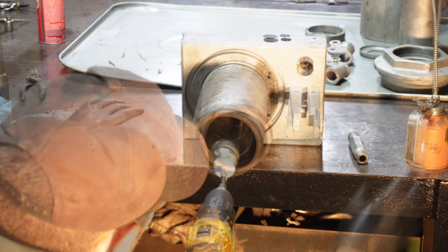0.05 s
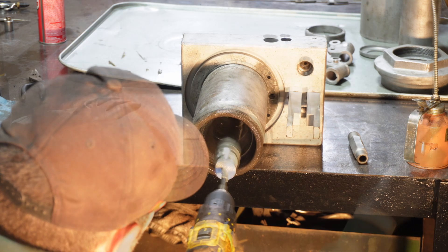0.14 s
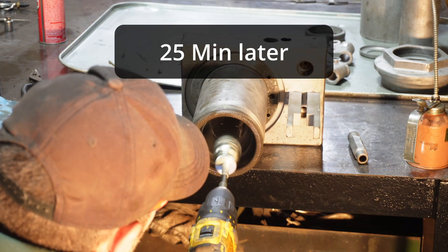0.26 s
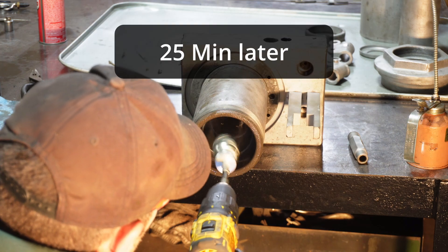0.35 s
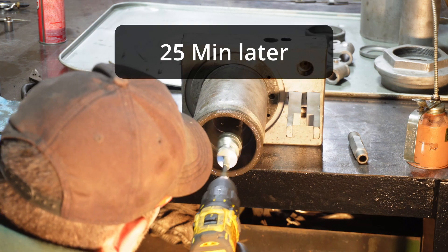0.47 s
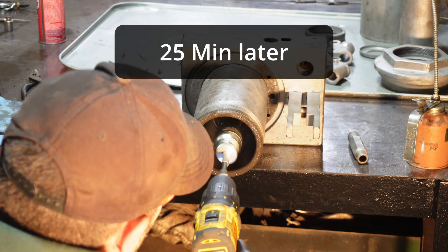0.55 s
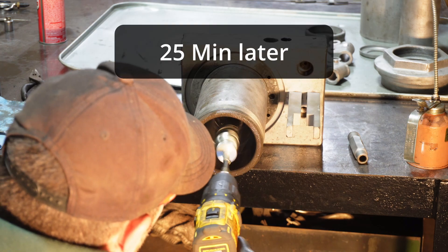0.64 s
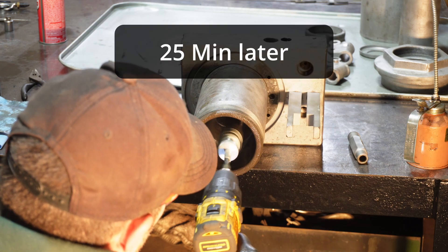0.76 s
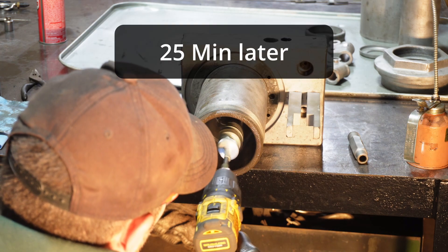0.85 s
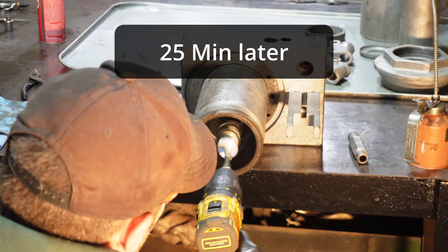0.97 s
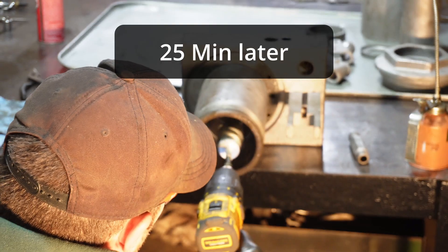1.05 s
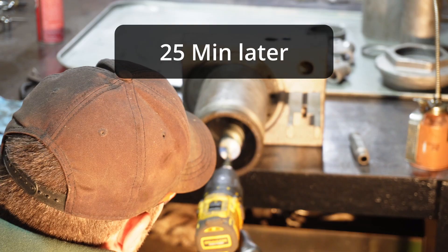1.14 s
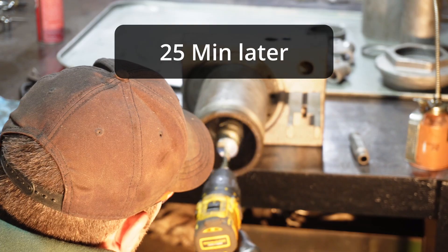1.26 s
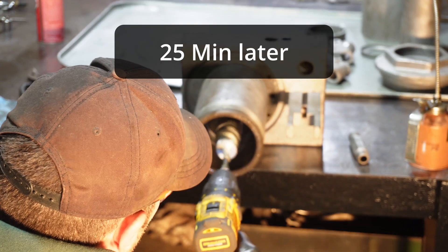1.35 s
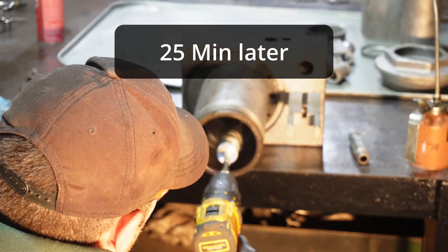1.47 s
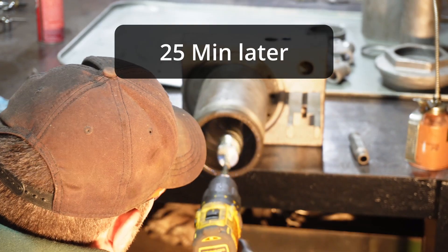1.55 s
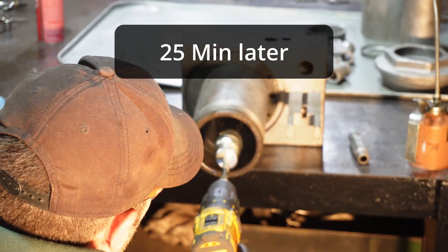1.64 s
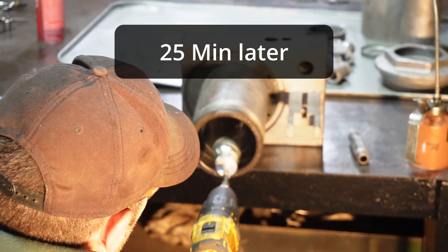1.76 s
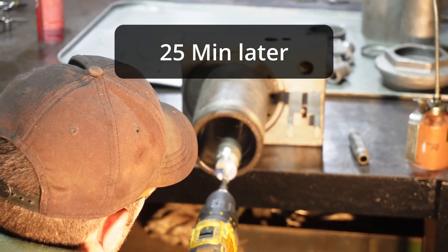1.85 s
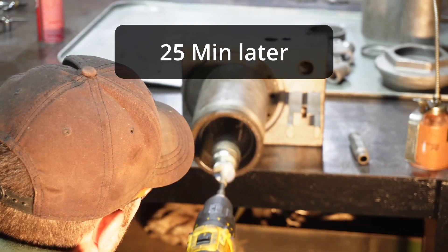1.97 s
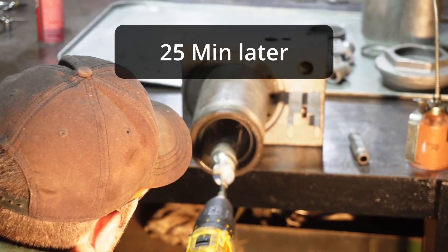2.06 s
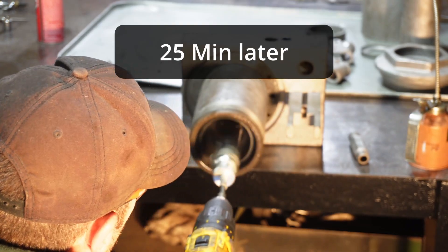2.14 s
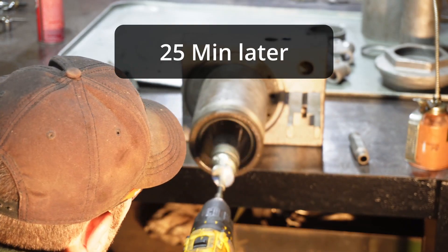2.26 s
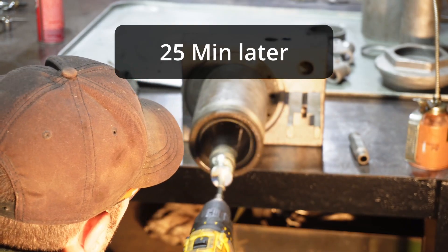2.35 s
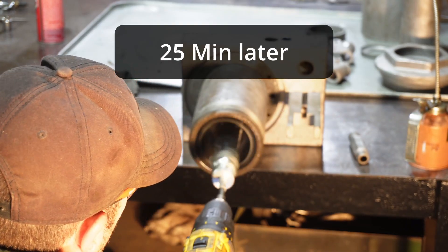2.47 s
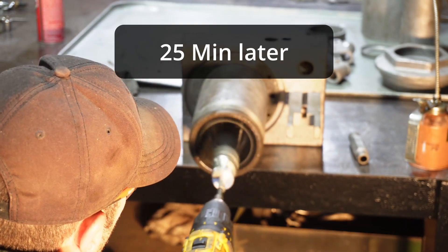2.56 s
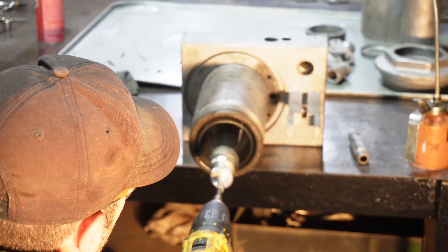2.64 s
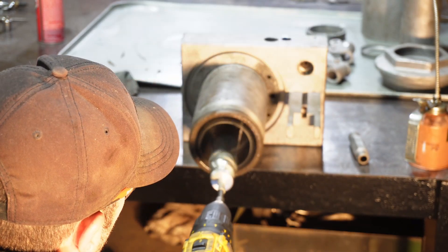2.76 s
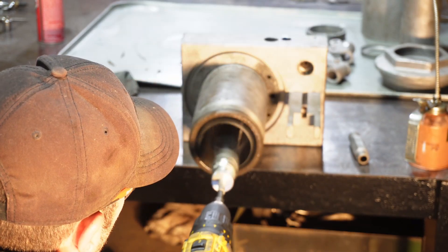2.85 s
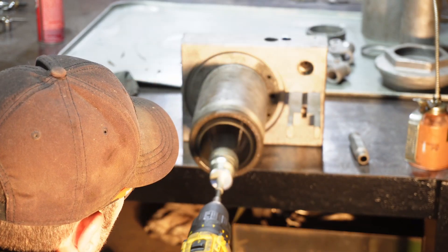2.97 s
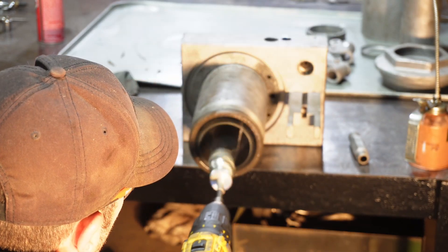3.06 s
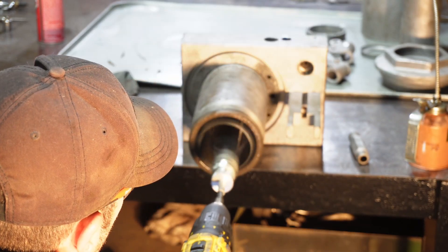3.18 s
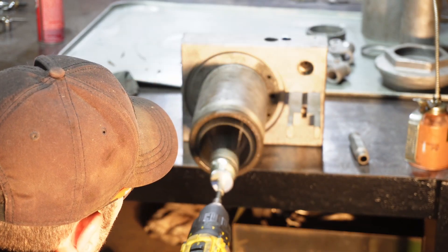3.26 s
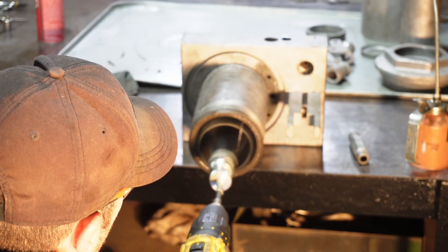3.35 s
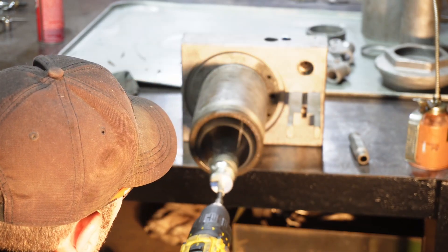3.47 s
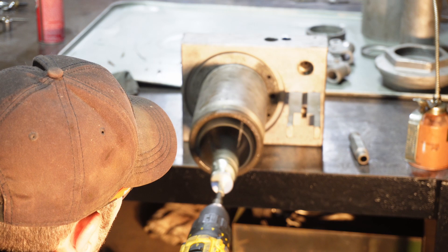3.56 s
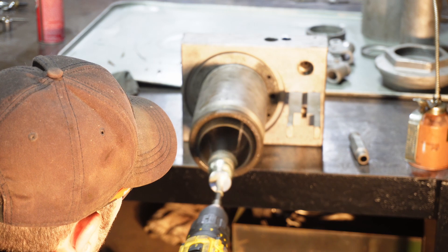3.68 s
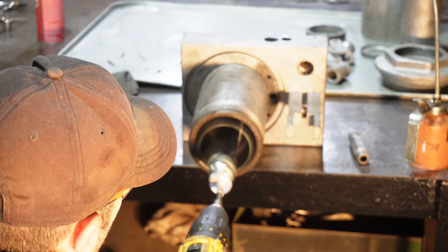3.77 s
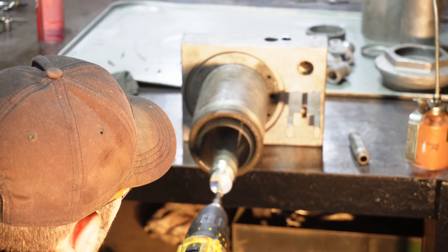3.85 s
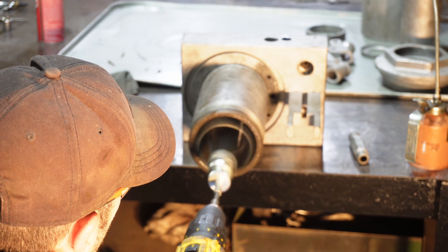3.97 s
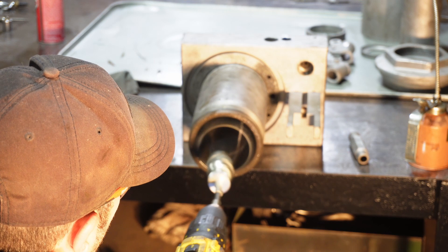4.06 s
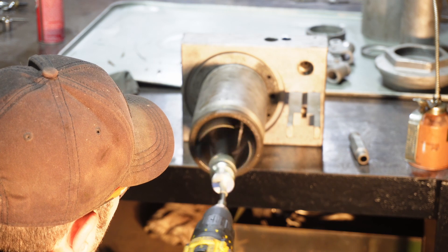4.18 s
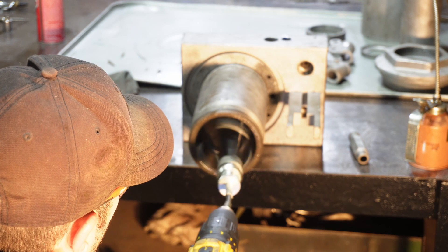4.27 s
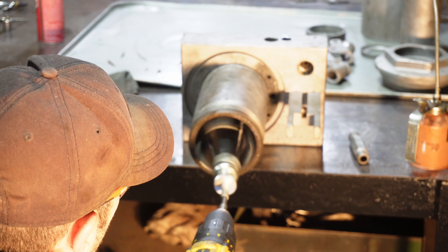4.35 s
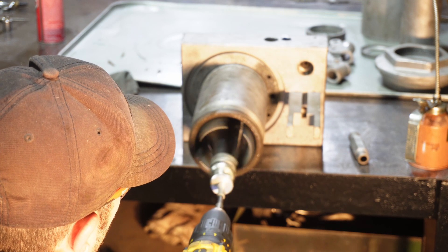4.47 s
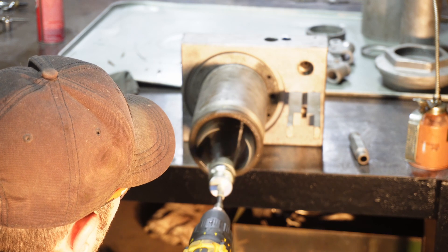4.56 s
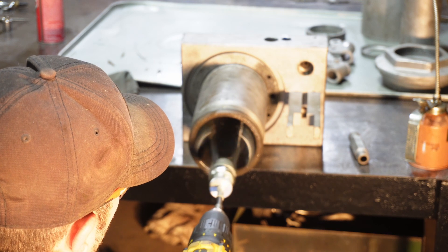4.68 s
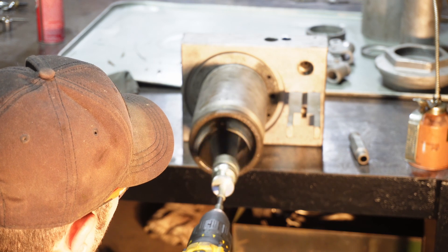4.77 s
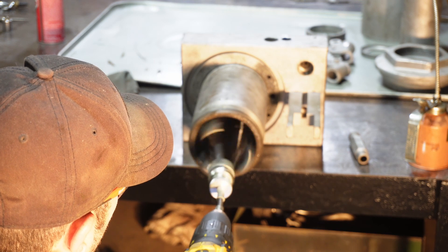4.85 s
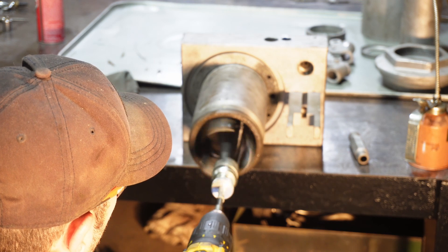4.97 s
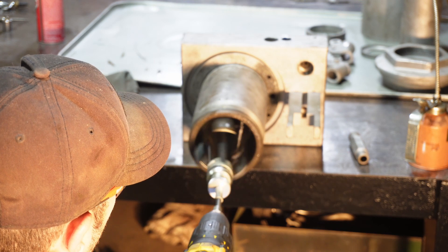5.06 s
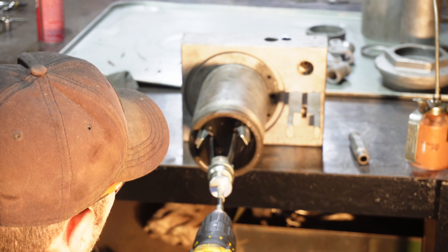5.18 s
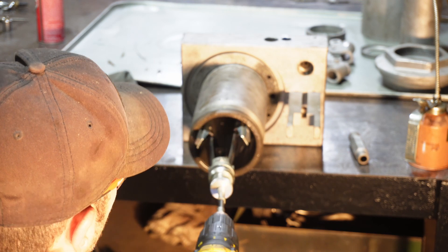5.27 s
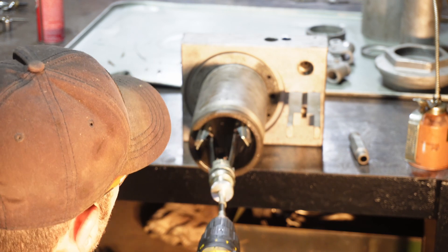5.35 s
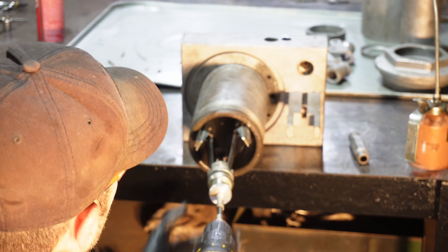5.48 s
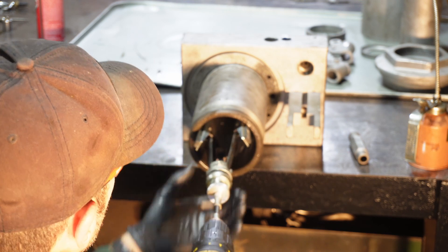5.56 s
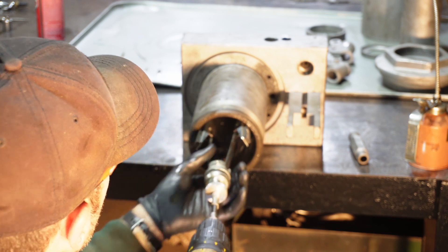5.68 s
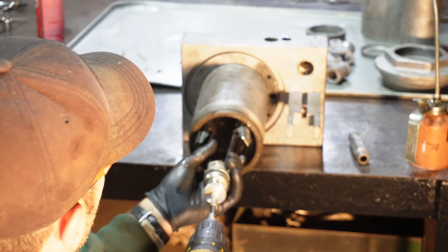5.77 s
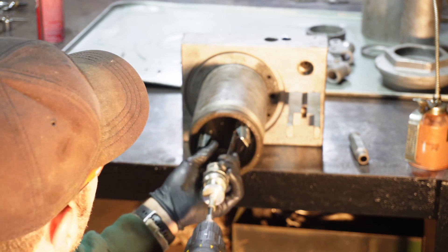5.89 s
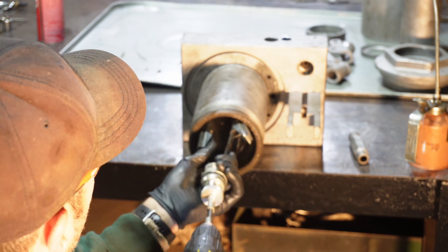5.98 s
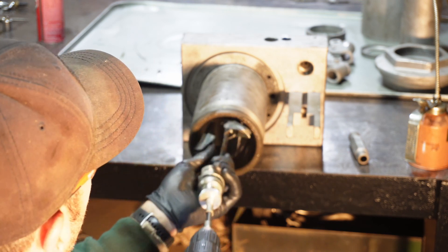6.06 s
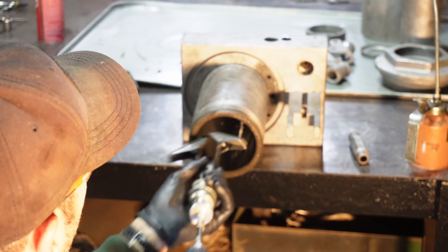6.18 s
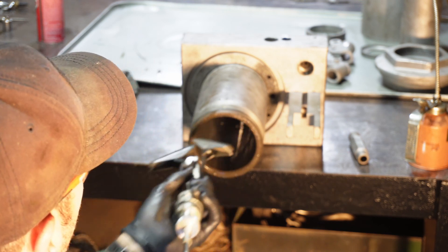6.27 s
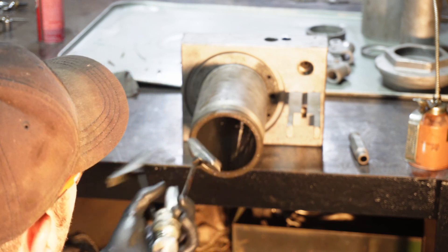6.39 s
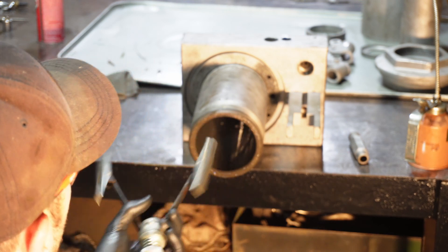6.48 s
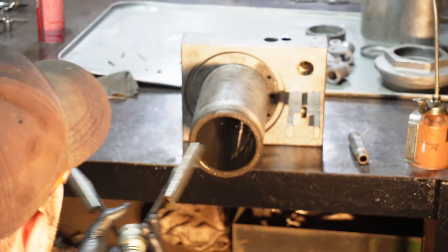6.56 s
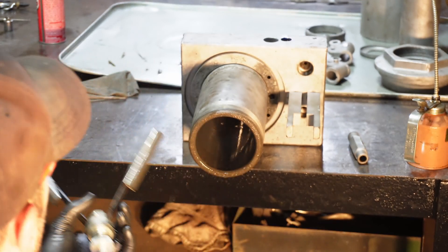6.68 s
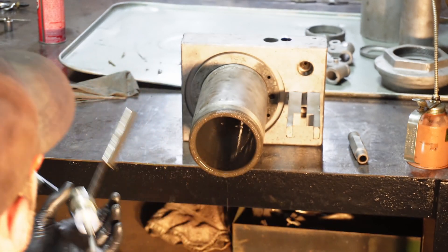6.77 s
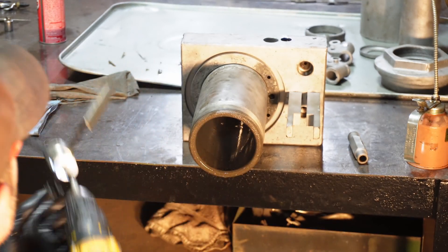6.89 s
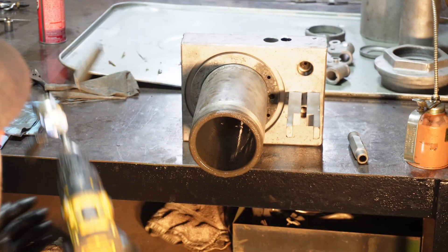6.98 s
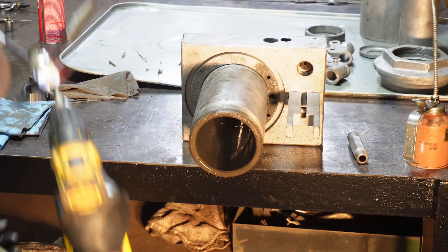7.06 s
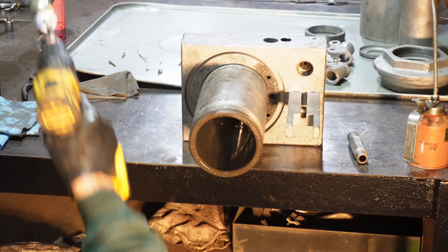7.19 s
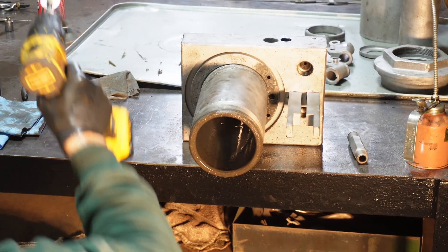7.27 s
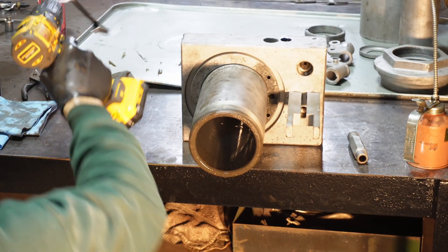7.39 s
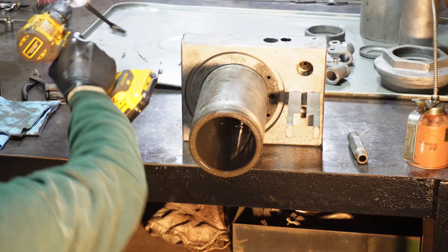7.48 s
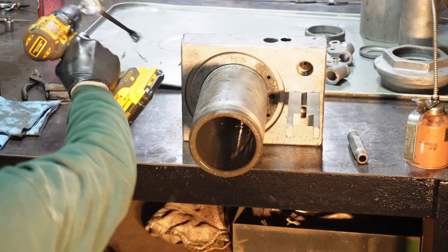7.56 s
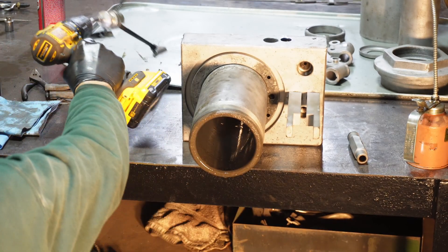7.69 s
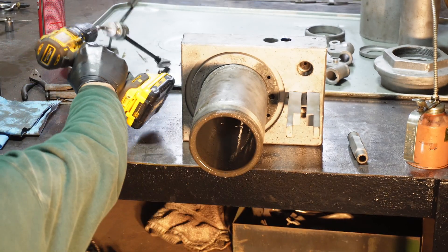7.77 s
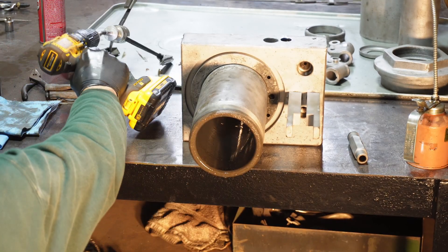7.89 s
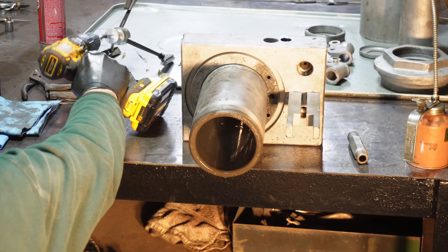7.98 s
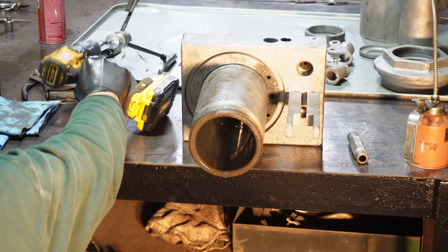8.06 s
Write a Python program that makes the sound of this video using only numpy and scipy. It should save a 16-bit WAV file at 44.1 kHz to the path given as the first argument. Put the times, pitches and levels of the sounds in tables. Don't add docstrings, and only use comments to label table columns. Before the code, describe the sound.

Close in a quiet workshop, a cordless drill whines at near full speed, abrasive stones scraping inside a steel cylinder. After about four seconds the pitch sinks in two steps and ends with a click. The sprung hone rattles out of the bore, loose arms tick, gloves and sleeves rustle, and finally the drill drags and drops onto a steel bench with a short, hollow ring.

```python
import sys
import numpy as np
from scipy import signal
from scipy.fft import rfft, irfft, next_fast_len
from scipy.io import wavfile
from scipy.ndimage import map_coordinates

SR = 44100
rng = np.random.default_rng(int(sys.argv[2]) if len(sys.argv) > 2 else 0)


def nominal_scale(level):
    x = np.asarray(level, float) / 20
    return 10 ** x


def store_pcm(level_fs):
    pcm = np.round(np.clip(level_fs, -1, 1) * 32767).astype(np.int16)
    wavfile.write(sys.argv[1], SR, np.atleast_2d(pcm).T)


N = 358533
TIME = np.arange(N) / SR

# [f/Hz, level/dB]
FLOOR_SPECTRUM = [(15, -41), (25, -5.5), (154, -13), (320, -4), (825, -37), (945, -28), (2070, -19),
                  (5360, -21), (12100, -27), (16300, -26.5)]
# [t/s, level/dB]
MOVEMENT = [(5.18, -56), (5.25, -65), (5.5, -65.5), (5.83, -68), (6.07, -56), (6.55, -64), (6.68, -67),
            (7.07, -53.5), (7.4, -53), (7.83, -58)]
# [f/Hz, density/dB]
MURMUR_SPECTRUM = [(15, -47), (25, -5), (131, -5), (293, 5), (331, 1), (461, 6.5), (712, 2), (913, 1.5),
                   (2620, -12), (3500, -21), (4550, -60), (7700, -120)]
# [f/Hz, density/dB]
RUSTLE_SPECTRUM = [(1060, -45), (1800, -8.5), (3250, -8), (4120, -3.5), (5150, -1), (6910, -9), (7650, -23),
                   (12900, -19), (16300, -31)]
# [f/Hz, width/Hz, level/dB]
SPRING_MODES = [(2860, 140, 2), (4200, 350, 5.5), (5270, 160, 2), (7330, 130, 2), (8220, 160, -4.5),
                (12900, 400, -19)]
# [t/s, level/dB]
FAN_LEVEL = [(5.25, -92), (5.45, -65), (6, -72), (6.3, -58), (6.85, -67), (7, -90)]
# [t/s, level/dB]
THUMPS = [(5.65, -80), (6.92, -54), (7.66, -60)]
# [t/s, level/dB, f/Hz]
SWISHES = [(5.42, -63, 1600), (7.18, -57, 1000), (7.38, -56, 2500), (7.66, -59, 700)]
# [t/s, rise/s, sheet rumble level/dB, edge grit level/dB, grit start re its peak/dB]
BENCH_MOVES = [
    (7.831, 0.079, -29, -39.5, 0),
    (8.019, 0.0066, -20, -31.5, -25),
]
# [f/Hz, density/dB]
SHEET_SPECTRA = [
    [(35, -60), (60, -36), (268, -11), (325, -2), (543, -7), (669, 1), (825, -9), (1100, -7), (2800, -22),
     (3640, -50), (6160, -120)],
    [(35, -76), (60, -61), (124, -14.5), (221, -14), (281, -2.5), (319, -13), (369, 2.5), (407, 0.5),
     (2800, -23.5), (3640, -59), (6160, -120)],
]
# [f/Hz, density/dB]
GRIT_SPECTRUM = [(1060, -33), (1800, -23), (2350, -6), (2930, 3), (3870, 8), (4690, 5), (15100, -21),
                 (16300, -40)]
# [f/Hz, level/dB, t60/s]
LANDING = (8.0185, [(280, -29, 5.0), (413, 4.5, 0.23), (591, -11.5, 0.73), (820, 4, 0.16), (1120, -12, 0.5),
           (1410, -16.5, 0.35)])
# [t/s, first mode level/dB, second mode level/dB]
WALL_NUDGES = [(4.52, -57, -58), (4.92, -50, -64), (5.23, -55, -88), (5.46, -58, -76), (5.66, -62, -85),
               (5.96, -56, -84), (6.07, -48, -48.5), (6.25, -53, -68), (6.32, -53.5, -75)]
WALL_HZ = [326, 408]
# [t/s, level/dB]
SQUEAKS = [(5.862, -77), (6.035, -55.5), (6.09, -60)]
# [t/s, peak level/dB, f/Hz, edge level/dB]
TICKS = [(5.1632, -20, 3870, -17), (5.2974, -42, 5180, -13), (5.327, -44, 3460, -36),
         (5.392, -45.5, 3150, -22), (5.454, -47, 5350, -13), (5.5832, -49, 5170, -8),
         (6.712, -45, 900, -23), (6.7496, -54, 4310, -19), (6.7754, -39, 4320, -16), (6.78, -36, 4200, -17),
         (6.8236, -30.5, 2440, -25), (6.8319, -27.5, 4340, -25), (6.864, -57, 4180, -13),
         (6.8902, -46, 5740, -9), (6.9055, -27.5, 5270, -8), (6.91, -26.5, 4820, -12),
         (6.9204, -31, 4970, -14), (7.0329, -43, 4560, -15), (7.067, -39, 2480, -24),
         (7.0865, -35, 6050, -34), (7.1776, -60.5, 1000, -34), (7.3215, -37.5, 5870, -7),
         (7.4659, -47, 5200, -22), (7.5356, -37, 4660, -25), (7.606, -34.5, 5430, -22),
         (7.619, -40, 5280, -27.5), (7.7263, -43, 4270, -20), (7.7608, -45, 4150, -20)]
# [t/s, peak level/dB, f/Hz, chatter/s]
RATTLE = [(5.8636, -23, 5300, 0), (5.8855, -38, 5200, 0), (5.995, -34, 4700, 0), (6.006, -30, 4610, 0),
          (6.0163, -23, 4450, 0), (6.109, -29.5, 4600, 0), (6.117, -19, 4530, 0.0015),
          (6.127, -19.5, 5300, .02), (6.173, -21, 4100, 0), (6.183, -46, 4240, 0), (6.2606, -25.5, 5000, 0),
          (6.28, -33.5, 5070, 0), (6.4065, -37, 3930, 0), (6.416, -36, 3850, 0.00064),
          (6.4344, -21.5, 4200, 0), (6.452, -31, 4370, .01), (6.475, -27.5, 4070, .01),
          (6.5024, -40, 4070, 0), (6.5527, -24, 4560, .01), (6.594, -22, 5250, 0), (6.5973, -29, 7940, 0),
          (6.616, -25.5, 4550, .02), (6.653, -45, 4440, 0)]
# [f/Hz, width/Hz, level/dB]
ARM_MODES = [(2270, 190, -13), (4200, 560, -6), (5200, 180, -29), (7370, 1400, -6), (7940, 3200, -7)]
# [f/Hz, density/dB]
SCRAPE_SPECTRUM = [(24, -65), (40, -61), (314, -9.5), (511, -11.5), (612, -11), (1090, -10.5), (1460, -2.5),
                   (2020, -7), (3000, -6), (3900, -34), (6600, -120)]
# [f/Hz, width/Hz, level/dB]
BORE_MODES = [(332.4, 23, 7.5), (394, 164, -3), (907, 128, 15), (1310, 27, -34), (1610, 204, 5),
              (1793, 81, 2.5)]
# [spindle order, level over the scrape/dB]
SHAKE = [(3, -33.5), (4, -35.5), (5, -47), (6, -36)]
# [f/Hz, density/dB]
HISS_SPECTRUM = [(2650, -30.5), (4500, -9.5), (4570, -17), (5040, -2.5), (6320, -5.5), (8220, -3.5),
                 (9820, -9.5), (14200, -9), (15300, -7.5), (16300, -49.5)]
# [f/Hz, width/Hz, level/dB]
HOUSING_MODES = [(3370, 316, 0), (4200, 890, -0.5), (5090, 710, -1.5), (2615, 95, -6)]
# [t/s, whine f/Hz]
FULL_SPEED = [(0, 2607), (.14, 2596), (.36, 2527), (.48, 2552), (.84, 2560), (1.2, 2581), (1.46, 2607),
              (1.57, 2601), (1.68, 2561), (2.06, 2529), (2.3, 2547), (2.54, 2565), (2.76, 2568),
              (2.9, 2555), (3.12, 2561), (3.4, 2553), (3.82, 2543), (4.1, 2554)]
# [t/s, pinion mesh f/Hz, settling time/s]
TRIGGER_STEPS = [
    (4.143, 1452, .096),
    (4.8, 975, .084),
]
# [t/s, load level/dB, whine level/dB]
LOAD = [(0, -32, -33), (.3, -24, -30.5), (.6, -25, -30.5), (1.2, -25.5, -30), (1.5, -26, -27),
        (1.8, -24.5, -30.5), (2.1, -24, -31), (2.4, -24, -27.5), (3.3, -24.5, -27), (4.12, -23.5, -27)]
GEAR_ORDERS = np.array([23, 24, 48, 19.63, 29.5, 5.3, 4.575, 7.33, 9.17, 9.95, 1.83, 1.665, 2.02]) / 23
# [level re mesh/dB, roughness/dB, change when slow/dB]
GEAR_LEVELS = [(-0.5, 2.3, 1.5), (-7, -5, 5.5), (-8, 2.5, 3.5), (-13, 10, -14), (-14.5, 6.5, -17),
               (-19.5, 2, 2.5), (-12.5, 3, -5.5), (-16, 3.5, -4), (-17, 5, 4.5), (-19.5, 6.5, 10.5),
               (-17, -3, -29), (-35, 15, -30), (-26.5, 4.5, -5)]
PARTNER_ORDERS = (25 / 23, 5.06 / 23)
PARTNER_LEVELS = (-11, -15)
# [f/Hz, level/dB]
MICROPHONE = [(30, -20.5), (90, 0), (200, -2), (15200, -0.5), (16400, -20)]


def unit(x):
    return x / np.sqrt(np.mean(x ** 2) + 1e-20)


def curves(rows, outside=-140):
    s, *columns = np.transpose(rows)
    return [np.interp(TIME, s, column, outside, outside) for column in columns]


def wobble(rate):
    knots = rng.standard_normal(int(N * rate / SR) + 4)
    return map_coordinates(knots, [TIME * rate])


def sine(hz):
    return np.sin(2 * np.pi * hz * TIME)


def filtered(x, response):
    m = next_fast_len(len(x) + SR // 4)
    return irfft(rfft(x, m) * response(np.fft.rfftfreq(m, 1 / SR)), m)[:len(x)]


def colour(points):
    f, db = np.transpose(points)
    return lambda hz: nominal_scale(np.interp(np.log(hz + 1), np.log(f + 1), db))


def modes(rows):
    def response(f):
        total = 0
        for k, (centre, width, db) in enumerate(rows):
            damping = 1j * f * width
            total = total + (-1) ** k * nominal_scale(db) * damping / (centre * centre - f * f + damping)
        return total
    return response


def noise(response, grain_db=0):
    return unit(filtered(rng.standard_normal(N) * nominal_scale(grain_db * wobble(700)), response))


def settle(s, takes):
    return 1 - np.exp(-(np.maximum(TIME - s, 0) / takes) ** 2)


def swells(times, levels_db, rise_db, fall_db):
    return sum(nominal_scale(db - np.where(TIME < s, rise_db, fall_db) * abs(TIME - s))
               for s, db in zip(times, levels_db))


def walls(x, t60):
    t = np.arange(SR // 2) / SR
    tail = rng.standard_normal(len(t)) * nominal_scale(-60 * t / t60)
    return signal.fftconvolve(np.pad(x, (300, 0)), tail / np.linalg.norm(tail))[:N]


def contacts():
    period_s, rebound_loss_db, drag_edge_db = .0098, 3.5, -18
    rows = list(TICKS)
    for s, db, hz, lasts in RATTLE:
        for k in range(round(lasts / period_s) + 1):
            rows.append((s + k * period_s, db - k * rebound_loss_db, hz, drag_edge_db))
    return rows


def body_movement(move_db):
    out = nominal_scale(move_db + 1.5 * wobble(16)) * noise(colour(MURMUR_SPECTRUM))
    out += swells(*np.transpose(THUMPS), 250, 250) * noise(modes([(60, 70, 0)]))
    for s, db, hz in SWISHES:
        out += swells([s], [db], 600, 130) * noise(modes([(hz, 0.43 * hz, 0)]), grain_db=2)
    return out


def glove_rustle(move_db):
    rub_db, loose_db, sleeve_db = -39, -5.5, -13.5
    s, db = np.transpose(contacts())[:2, 1:]
    db[:len(TICKS) - 1] += loose_db
    rub = nominal_scale(rub_db) * swells(s, db, 2500, 140)
    springs = 0
    for mode in SPRING_MODES:
        springs = springs + nominal_scale(mode[2] + 4 * wobble(14)) * noise(modes([mode]), grain_db=3)
    cloth = noise(colour(RUSTLE_SPECTRUM), grain_db=3)
    rustle = rub * (cloth + nominal_scale(-6) * springs) + nominal_scale(move_db + sleeve_db) * cloth
    return nominal_scale(0.93 * wobble(30)) * rustle


def workshop():
    move_db, = curves(MOVEMENT)
    fan = nominal_scale(curves(FAN_LEVEL)[0] + 0.92 * wobble(8)) * sine(454)
    floor = nominal_scale(-64) * noise(colour(FLOOR_SPECTRUM))
    return body_movement(move_db) + glove_rustle(move_db) + fan + floor


def bench():
    start_db, rumble_fall, grit_fall = -6.5, 93, 139
    out = np.zeros(N)
    for (s, rise, rumble_db, grit_db, grit_start_db), sheet in zip(BENCH_MOVES, SHEET_SPECTRA):
        on = TIME > s
        after = np.maximum(TIME - s - rise, 0)
        before = np.clip(1 - (TIME - s) / rise, 0, 1)
        rumble = rumble_db + start_db * before - rumble_fall * after + 1.8 * wobble(50)
        grit = grit_db + grit_start_db * before - grit_fall * after
        out += on * nominal_scale(rumble) * noise(colour(sheet))
        out += on * nominal_scale(grit) * noise(colour(GRIT_SPECTRUM), grain_db=1.0)
    strike_s, sheet_modes = LANDING
    t = np.maximum(TIME - strike_s, 0)
    for hz, db, t60 in sheet_modes:
        out += nominal_scale(db - 24.5 - 60 * t / t60) * np.sin(2 * np.pi * hz * t)
    return out


def cylinder():
    s, *levels = np.transpose(WALL_NUDGES)
    gains = [swells(s, db, 200, 208) for db in levels]
    squeak = swells(*np.transpose(SQUEAKS), 500, 350)
    out = nominal_scale(7.5) * squeak * noise(modes([(5300, 250, 0)]), grain_db=3)
    for gain, hz in zip([*gains, squeak], [*WALL_HZ, 2805]):
        drift = .6 * wobble(25)
        out += gain * nominal_scale(3.0 + 1.9 * wobble(30)) * np.sin(2 * np.pi * hz * TIME + drift)
    return out


def burst(grit, response):
    x = filtered(grit, response)
    return x / abs(x).max()


def hone():
    t60_s, rise_s = .022, .0008
    out, t = np.zeros(N + SR), np.arange(SR // 8) / SR
    knock_modes = modes([(715, 730, 0.)])
    edge_mode = modes([(12500, 7000, 0.)])
    for s, db, hz, edge_db in contacts():
        draw = rng.standard_normal((4, len(t)))
        shape = nominal_scale(-60 * t / t60_s + 4.3 * draw[3]) * (1 - np.exp(-t / rise_s))
        body = burst(draw[0] * shape, modes([*ARM_MODES, (hz, 380, 4)]))
        knock = burst(draw[1] * shape, knock_modes)
        edge = burst(draw[2] * shape, lambda f: edge_mode(f) ** 2)
        knock_db = -33 - 0.32 * db + 11.5
        hit = body + nominal_scale(knock_db) * knock + nominal_scale(edge_db + 6.0) * edge
        out[round(s * SR):][:len(t)] += nominal_scale(db) * hit
    return out[:N]


def stones(pressed, speed_db, spindle):
    bore = nominal_scale(-5.5) * pressed * noise(modes(BORE_MODES), grain_db=1.0) * nominal_scale(0.96 * wobble(40))
    shake = 0
    for k, db in SHAKE:
        shake = shake + nominal_scale(db + 4.3 * wobble(1.7)) * np.sin(round(k) * spindle + k * k)
    scrape = nominal_scale(-7.0) * noise(colour(SCRAPE_SPECTRUM))
    return nominal_scale(-7.5 + 0.26 * speed_db) * (bore + pressed * shake + scrape)


def hiss_and_housing(eased, speed_db, throb):
    hiss = nominal_scale(-3.5 + speed_db) * throb * noise(colour(HISS_SPECTRUM), grain_db=0.92)
    hiss -= 0.27 * eased * filtered(hiss, lambda f: f > 8500)
    housing = nominal_scale(1 + speed_db - 5) * throb * noise(modes(HOUSING_MODES), grain_db=1.94)
    return hiss + housing


def gear_train(turn, mesh_db, eased):
    out = np.zeros(N)
    for k, (db, rough_db, slow_db) in zip(GEAR_ORDERS, GEAR_LEVELS):
        rough = (np.clip(rough_db, -3 / 2, 3 / 2) + eased) * wobble(60)
        out += nominal_scale(db + rough + slow_db * eased) * np.sin(k * turn + 40 * k)
    return nominal_scale(mesh_db + 2) * out


def brake(turn, braking, eased):
    first_step = TIME < TRIGGER_STEPS[1][0]
    song = nominal_scale(-35.5 + 2 * wobble(60)) * np.sqrt(braking) * eased * first_step * np.sin(2 * turn)
    squeal = nominal_scale(-44 - 300 * abs(TIME - 5.152) + 3.6 * wobble(90)) * sine(1463)
    return song + squeal


def drill():
    mesh_per_whine = 4003 / 2553
    load_db, whine_db = curves(LOAD, outside=None)
    mesh_hz = curves(FULL_SPEED, outside=None)[0] * mesh_per_whine
    for s, hz, takes in TRIGGER_STEPS:
        mesh_hz = mesh_hz + (hz - mesh_hz) * settle(s, takes)
    pressed = np.clip(mesh_hz / 4000, 0, 1)
    eased = np.clip(3 * (1 - pressed), 0, 1)
    speed_db = 20 * np.log10(pressed)
    unload = settle(4.13, 0.023)
    braking = np.clip(-np.gradient(mesh_hz) * SR / 12000, 0, 1)
    cogging = .012 * eased / pressed * wobble(160)
    turn = 2 * np.pi * np.cumsum(mesh_hz * (1 + 0.0013 * wobble(30.1) + cogging)) / SR

    mesh_db = load_db - 7 + 1.5 * speed_db - 5 * braking
    tones = gear_train(turn, mesh_db, eased) + brake(turn, braking, eased)
    whine = whine_db + 5 + speed_db - 23 * unload + 1.3 * wobble(70)
    tones += nominal_scale(whine) * np.sin(turn / mesh_per_whine)
    for k, db in zip(PARTNER_ORDERS, PARTNER_LEVELS):
        tones += nominal_scale(load_db + db + 3 - 51 * unload + 0.28 * wobble(60)) * np.sin(k * turn)

    rotor = turn / 23
    spindle, slow_spindle = rotor * .1198, rotor * .0382
    throb = 1 + 0.11 * np.sin(rotor) + 0.092 * np.sin(2 * rotor)
    throb += 0.06 * np.sin(spindle) + 0.011 * np.sin(slow_spindle)
    rough = hiss_and_housing(eased, speed_db, throb) + stones(pressed, speed_db, spindle)
    stop_db = -1500 * np.maximum(TIME - 5.166, 0)
    return nominal_scale(stop_db) * (tones + nominal_scale(load_db - unload) * rough)


def scene():
    clicks = hone()
    reply = nominal_scale(-12.5) * walls(clicks, .16)
    mono = workshop() + bench() + cylinder() + clicks + reply + drill()
    return np.array([mono, mono])


def top_cut(x):
    return signal.sosfilt(signal.butter(12, 16430, fs=SR, output="sos"), x)


def record(dry):
    mix = np.array([filtered(x, colour(MICROPHONE)) for x in dry])
    return top_cut(mix)


dry = scene()
out = record(dry)
store_pcm(out)
```